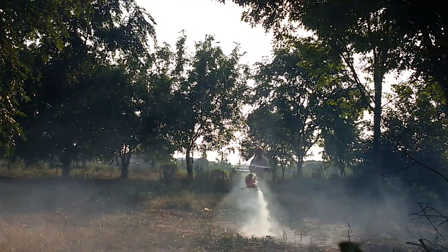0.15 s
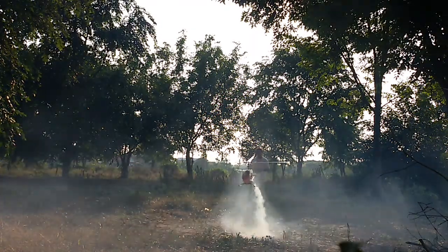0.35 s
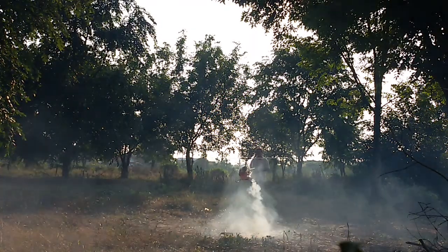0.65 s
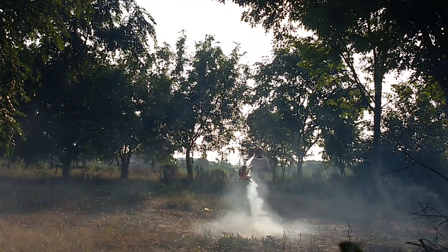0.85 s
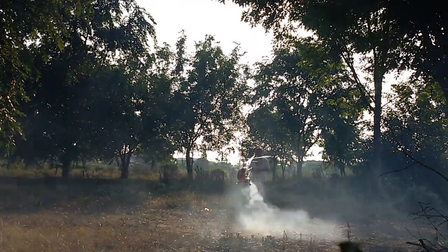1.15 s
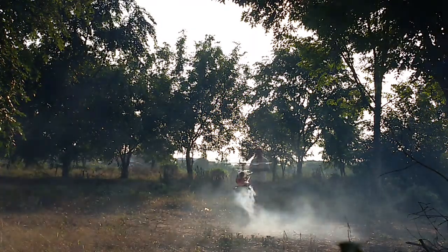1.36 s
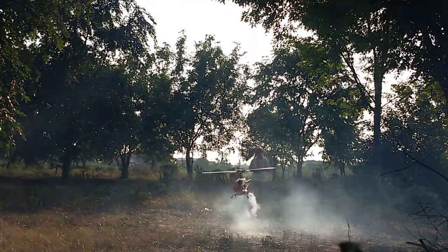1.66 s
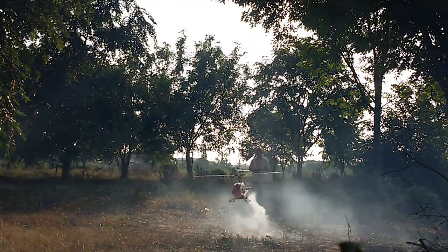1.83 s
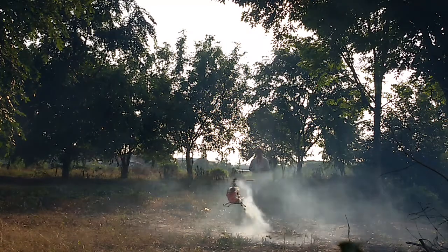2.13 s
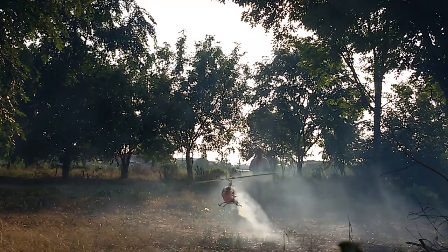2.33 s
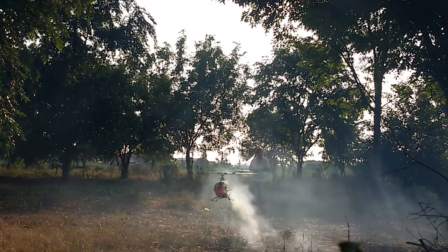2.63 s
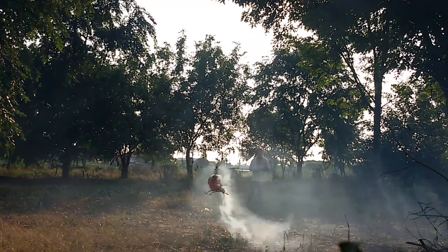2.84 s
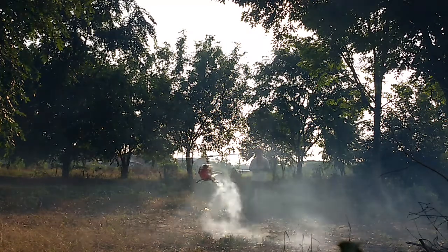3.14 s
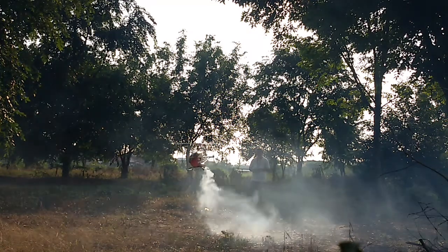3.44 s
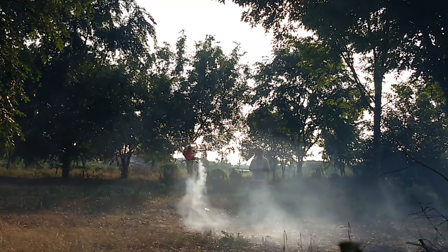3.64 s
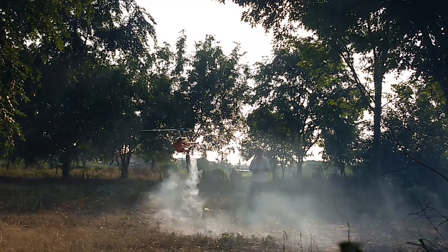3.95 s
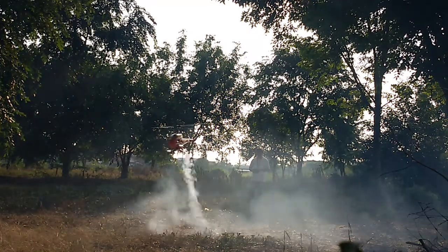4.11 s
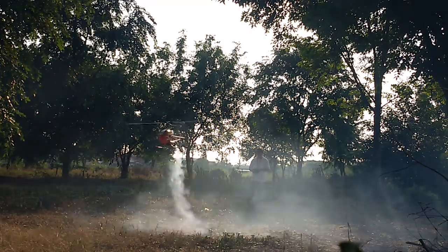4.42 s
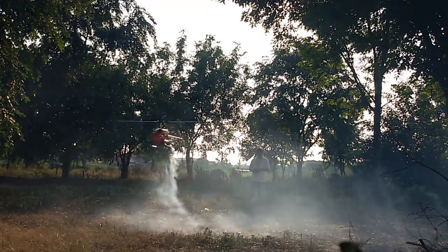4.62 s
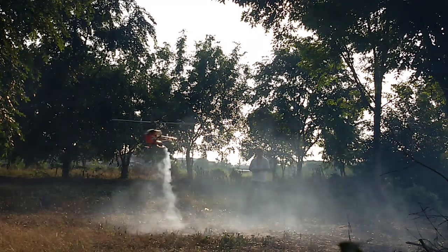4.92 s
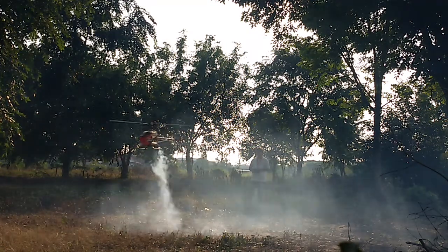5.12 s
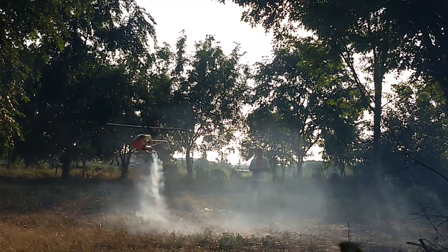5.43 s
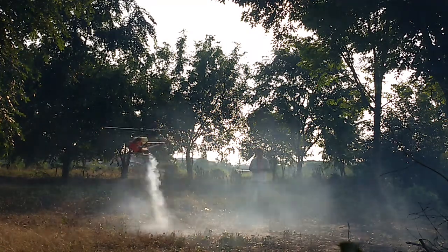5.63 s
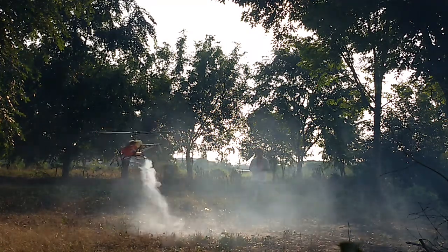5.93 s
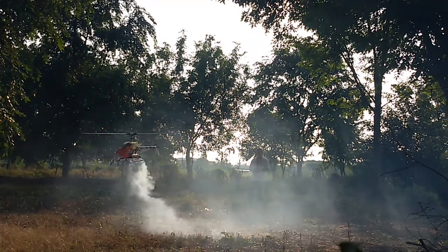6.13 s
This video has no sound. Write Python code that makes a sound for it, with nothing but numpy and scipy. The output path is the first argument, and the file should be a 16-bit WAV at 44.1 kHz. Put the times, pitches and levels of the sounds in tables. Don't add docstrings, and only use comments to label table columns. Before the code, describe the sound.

Steady nasal buzz of a model helicopter engine outdoors, with fluttering sharp rotor whistles, airy hiss, brief misfires and soft wind thumps.

```python
import sys
import numpy as np
from scipy import signal
from scipy.fft import rfft, irfft, next_fast_len
from scipy.io import wavfile
from scipy.ndimage import uniform_filter1d, map_coordinates

SR = 44100
rng = np.random.default_rng(int(sys.argv[2]) if len(sys.argv) > 2 else 0)


def persist_wave(psi):
    counts = np.round(np.clip(psi, -1, 1) * 32767).astype(np.int16)
    wavfile.write(sys.argv[1], SR, np.atleast_2d(counts).T)


def magnitude_from_level(level_db):
    exponent = np.asarray(level_db, float) / 20
    return 10 ** exponent


N = 276507
TOP_HZ = 14530

# (time [s], speed [Hz])
CRANK_SPEED = [(0.0, 196.33), (0.2, 196.64), (0.4, 198.17), (0.6, 198.51), (1.0, 200.2), (1.4, 202.15),
               (1.8, 204.84), (2.2, 205.42), (2.5, 205.58), (3.0, 206.63), (3.4, 205.5), (3.8, 206.66),
               (4.4, 208.89), (4.8, 209.15), (5.3, 210.33), (5.6, 210.61), (5.9, 211.87), (6.27, 211.94)]
# (time [s], engine loudness [dB], lag of the ground echo [ms], raggedness of the firing [dB])
HOVER_PATH = [(0, -.5, .6, -0.5), (.8, 0, 0.78, 1), (1.1, -1.5, 0.8, 1.5), (1.4, 3.5, 0.77, 2),
              (1.7, 1, 0.67, 0.5), (2, 0, 0.58, -2), (2.4, -1, 0.61, -4.5), (2.8, -2, 0.65, -3),
              (3.1, -3.5, 0.795, -4), (3.4, -1.5, 0.86, 0.5), (3.7, -3.5, 1, -1), (4, .5, 1.046, 2),
              (4.4, 0, 1.17, 4), (4.8, 0, 1.2, 1.5), (5.2, -1, 1.13, 3.5), (5.6, 0, 1.07, 4.5),
              (6, 2, 1.03, 1.5), (6.27, 1, 1.03, 4.5)]
# (time [s], downwash [dB], tilt of the disc to the camera [dB], bite of the blade edges [dB])
ROTOR_STATE = [(0, -1, 8, -3), (.3, 0, 7, -1), (.6, -0.11, 2, -9.5), (.9, -1.7, -8.5, -11),
               (1.2, 1, -2.5, -10), (1.5, 1, 1.5, -1.5), (1.8, 0, 4, 0.5), (2.1, -0.1, 8.5, 0.5),
               (2.4, 0.5, 9, 0.5), (2.7, .5, 4.5, 2.5), (3, 0.35, 4.5, 4.5), (3.3, -1, -6, -3.5),
               (3.7, -2, -6, 0), (4.2, -0.2, -1, -0.5), (4.5, .5, -3, 4), (5.1, 0, -3.5, 2),
               (5.7, -2, -8.5, 0.5), (6.27, 0, -6, 0.5)]


def unit(x):
    return x / np.sqrt(np.mean(np.abs(x) ** 2) + 1e-20)


def curves(rows):
    seconds, *columns = np.transpose(rows)
    return [np.interp(np.arange(N) / SR, seconds, column) for column in columns]


def wobble(rate):
    knots = rng.standard_normal(int(N * rate / SR) + 4)
    return map_coordinates(knots, [np.arange(N) * rate / SR])


def swells(seconds, sizes, lengths):
    t = np.arange(0, N + 64, 64)
    s, size, length = (np.reshape(v, (-1, 1)) for v in (seconds, sizes, lengths))
    bells = size * np.exp(-((t / SR - s) / length) ** 2)
    return np.interp(np.arange(N), t, np.sum(bells, axis=0))


def coloured(x, points, lo_hz=0, hi_hz=SR):
    size = next_fast_len(N + 8192)
    hz = np.fft.rfftfreq(size, 1 / SR)
    f, db = np.transpose(points)
    gain = magnitude_from_level(np.interp(np.log(hz + 1), np.log(f + 1), db))
    gain = gain * (hz >= lo_hz) * (hz < hi_hz)
    return irfft(rfft(x, size) * gain, size)[:N]


def patchy(patchy_db):
    z = signal.stft(rng.standard_normal(N), nperseg=512)[2]
    field = uniform_filter1d(rng.standard_normal(z.shape), size=6, axis=0)
    field = uniform_filter1d(field, size=12, axis=1)
    return signal.istft(z * magnitude_from_level(patchy_db * unit(field)), nperseg=512)[1][:N]


def exhaust(crank):
    # (order, level [dB])
    order_levels = [(1, 0), (2, 0), (3, -4.5), (4, -6), (5, -6.5), (6, -4.5), (7, -4.5), (8, -7.5), (9, -5),
                    (10, -5.5), (11, -15), (12, -21), (13, -26.5), (14, -22), (15, -14), (16, -18.5),
                    (17, -18.5), (18, -19.5), (19, -16.5), (20, -11.5), (21, -14.5), (22, -18.5)]
    muffler_levels = [-37, -34, -34.5, -31, -26.5]
    shaken = crank + 0.006 * wobble(60)
    out = np.zeros(N)
    for order, (number, db) in enumerate(order_levels, 1):
        flutter_db = min(1.3 + .2 * number, 2.1) * (.45 * wobble(5) + wobble(16))
        drift = 2 * np.pi * rng.random() + 0.043 * number * wobble(9)
        group_db = muffler_levels[np.searchsorted([1, 2, 5, 7], order)]
        tone = np.sin(2 * np.pi * order * shaken + drift)
        out += np.sqrt(2) * magnitude_from_level(group_db + db + flutter_db) * tone
    return magnitude_from_level(curves(HOVER_PATH)[0]) * out


def odd_firings(crank):
    # (frequency [Hz], level [dB])
    pop_colour = [(25, -40), (60, -24), (110, -2), (300, -6), (510, -2.5), (720, -3), (1100, -4), (1750, 1),
                  (2150, 2), (2400, -7), (2700, -23.5), (3000, -7), (4000, -8), (6000, -32.5)]
    # (level [dB], growth with raggedness [dB/dB], growth in a stumble [dB/dB])
    band_laws = [
        (-52, .4, 1.05),
        (-51.5, 1.1, .55),
        (-47.5, .45, .3),
    ]
    # (time [s], strength [dB])
    stumbles = [(.68, 5), (.98, 8.5), (1.191, 8.5), (1.36, 5.5), (1.55, 7.5), (1.849, 7.5), (2.04, 10.5),
                (2.36, 3), (2.55, 6), (2.85, 5.5), (3.25, 6), (3.49, 7.5), (3.65, 6.5), (3.75, 4),
                (4.0, 3.5), (4.36, 7.5), (4.52, 7.5), (4.769, 10.5), (5.07, 2), (5.22, 6.5), (5.38, 4.5),
                (5.601, 5.5), (5.72, 6), (5.869, 3), (5.99, 9), (6.12, 8)]
    stumble_s = .035
    edges_hz = [0, 440, 1000, SR]
    fired = np.diff(np.floor(crank), prepend=0) > 0
    pops = unit(fired * rng.standard_normal(N)) + 0.99 * patchy(patchy_db=4.0)
    ragged_db = curves(HOVER_PATH)[2]
    stumble_db = swells(*np.transpose(stumbles), stumble_s)
    out = np.zeros(N)
    for (db, with_ragged, with_stumble), lo, hi in zip(band_laws, edges_hz, edges_hz[1:]):
        level_db = db + 23.5 + with_ragged * ragged_db + with_stumble * stumble_db + 1.1 * wobble(12)
        out += coloured(magnitude_from_level(level_db) * pops, pop_colour, lo, hi)
    return out


def over_field(x):
    echo_share, echo_hz = .41, 3970
    lag = curves(HOVER_PATH)[1] * SR / 1000
    late = map_coordinates(x, [np.arange(N) - lag])
    return x + echo_share * coloured(late, [(echo_hz / 2, 0), (echo_hz * 2, -12)])


def whistle(rotor, edge, level_db):
    tip_mach = .3
    rated_hz = 206
    pitch_with_speed = .6
    top_hz, top_turn, early, width, late_db, band_hz = edge
    u = (rotor - top_turn + .5) % 1 - .5
    doppler = (1 - tip_mach) / (1 - tip_mach * np.cos(2 * np.pi * u))
    hz = top_hz * (curves(CRANK_SPEED)[0] / rated_hz) ** pitch_with_speed * doppler
    coming = np.exp(-.5 * ((u - early) / width) ** 2)
    going = magnitude_from_level(late_db) * np.exp(-.5 * ((u + early) / (1.5 * width)) ** 2)
    unsteady = unit(3.2 * (120 / band_hz) ** .6 + wobble(band_hz) + 1j * wobble(band_hz))
    tone = np.real(unsteady * np.exp(2j * np.pi * np.cumsum(hz) / SR))
    each_pass_db = .6 * wobble(24)
    beam = (0.048 / width) ** .6
    return np.sqrt(2) * magnitude_from_level(level_db + each_pass_db) * (coming + going) * tone * beam


def blade_whistles(rotor):
    # (top pitch [Hz], rotor angle at the top [turns], loudest against the top [turns],
    # lobe width [turns], late lobe [dB], bandwidth [Hz])
    edges = [
        (13980, .805, -0.084, .028, -14.5, 120),
        (8362, .8, -0.074, 0.036, -8, 400),
        (10720, 0.37, -0.085, 0.078, -9.5, 730),
        (7865, .31, -0.074, 0.11, -22, 900),
    ]
    # (level [dB], growth with tilt [dB/dB], growth with bite [dB/dB])
    edge_laws = [(-20, 1.1, .01), (-16, .01, 1.01), (-27, -0.7, 0.82), (-26, .7, .3)]
    _, tilt_db, bite_db = curves(ROTOR_STATE)
    return sum(whistle(rotor, edge, db + with_tilt * tilt_db + with_bite * bite_db)
               for edge, (db, with_tilt, with_bite) in zip(edges, edge_laws))


def hiss(crank, rotor):
    # (frequency [Hz], level per Hz [dB])
    air_colour = [(1500, -26), (2750, -30), (3500, -18), (4050, -6.5), (4930, -11), (5980, -2.5),
                  (7000, -4), (8000, -2), (8900, -6.5), (9600, -5.5), (11500, -6.5), (13500, -4.5),
                  (14400, -4)]
    split_hz = 9300
    wash_db, tilt_db, _ = curves(ROTOR_STATE)
    lower_db = -17.5 + wash_db + 0.35 * curves(HOVER_PATH)[0] - 0.24 * tilt_db
    upper_db = -21 + wash_db
    puff = np.cos(2 * np.pi * crank)
    swish = np.cos(4 * np.pi * (rotor - .8))
    lower = unit(coloured(patchy(patchy_db=0.5), air_colour, hi_hz=split_hz))
    upper = unit(coloured(patchy(patchy_db=1.0), air_colour, lo_hz=split_hz, hi_hz=TOP_HZ))
    lower *= magnitude_from_level(lower_db + 0.85 * puff + 0.72 * swish + 0.27 * wobble(9))
    upper *= magnitude_from_level(upper_db + 0.53 * puff + 2.17 * swish + 0.45 * wobble(9))
    return lower + upper


def tail_rotor(crank):
    # (multiple of crank speed, level [dB])
    tail_tones = [(.5, -52), (1.5, -51.5)]
    out = np.zeros(N)
    for multiple, db in tail_tones:
        phase = 2 * np.pi * multiple * crank + .8 * wobble(5.4)
        out += np.sqrt(2) * magnitude_from_level(db + 4.4 * wobble(11)) * np.sin(phase)
    return out


def breeze():
    # (time [s], peak level [dB], length [s])
    gusts = [(.17, -55, .05), (0.577, -44, 0.077), (.74, -57, .04), (1.15, -41.5, 0.14),
             (1.552, -51.5, 0.14), (1.974, -37.5, .13), (2.52, -48.5, .05), (2.72, -48, 0.058),
             (2.872, -46, .04), (3.27, -39.5, 0.053), (3.552, -46.5, .08), (3.77, -46.5, .05),
             (3.93, -43, .07), (4.304, -41, 0.052), (4.5, -48, .07), (4.833, -44, 0.11),
             (5.051, -42.5, .06), (5.294, -38, 0.046), (5.548, -40.5, 0.052), (5.71, -52.5, 0.048),
             (5.945, -37, 0.054), (6.12, -38, 0.043)]
    # (frequency [Hz], level per Hz [dB])
    rumble_colour = [(20, -22), (45, -12.5), (80, -0.5), (130, -4), (200, -26)]
    calm_db = -67.5
    s, db, length = np.transpose(gusts)
    strength = magnitude_from_level(calm_db) + swells(s, magnitude_from_level(db), length)
    rumble = unit(coloured(rng.standard_normal(N), rumble_colour))
    return strength * magnitude_from_level(3.6 * wobble(18)) * rumble


def scene():
    gear = 8.52
    crank = np.cumsum(curves(CRANK_SPEED)[0]) / SR
    rotor = crank / gear
    engine = over_field(exhaust(crank) + odd_firings(crank))
    one = engine + blade_whistles(rotor) + hiss(crank, rotor) + tail_rotor(crank) + breeze()
    return np.array([one, one])


def camera_rounding(x, hop=1024, lead=1728, rate=48000):
    # (frequency [Hz], step [dB])
    step_sizes = [(50, -12), (300, -12), (750, -13.5), (1500, -12), (2700, -11), (3500, -13.5), (5000, -14),
                  (9000, -15), (14000, -15)]
    fast = signal.resample_poly(x, 160, 147)
    n, k = np.arange(2 * hop)[:, None] + .5, np.arange(int(2 * hop * TOP_HZ / rate)) + .5
    window = np.sin(np.pi * n / (2 * hop))
    basis = np.sqrt(2 / hop) * window * np.cos(np.pi / hop * (n + hop / 2) * k)
    blocks = np.pad(fast, (lead, 2 * hop - (len(fast) + lead) % hop)).reshape(-1, hop)
    terms = np.hstack([blocks[:-1], blocks[1:]]) @ basis

    band = np.searchsorted(np.r_[4:40:4, 40:96:8, 96:144:12, 144:len(k):24], k)
    f, db = np.transpose(step_sizes)
    s, _, tilt_db, _ = np.transpose(ROTOR_STATE)
    block_s = (np.arange(len(terms)) * hop + hop - lead) / rate
    busy_db = np.interp(block_s, s, tilt_db) - 1
    chance_db = rng.standard_normal((len(terms), band.max() + 1))[:, band]
    chance_db = chance_db + .8 * rng.standard_normal((len(terms), 1))
    usual_db = np.interp(np.log(k * rate / 2 / hop), np.log(f), db)
    step = magnitude_from_level(usual_db + .36 * busy_db[:, None] + 1.2 * chance_db)

    count = np.floor((np.abs(terms) / step) ** .75 + .4054)
    frames = (step * np.sign(terms) * count ** (4 / 3)) @ basis.T
    joined = (frames[1:, :hop] + frames[:-1, hop:]).ravel()[lead - hop:]
    return signal.resample_poly(joined, 147, 160)[:N]


def roll_off(x):
    return signal.sosfilt(signal.butter(12, 15450, fs=SR, output="sos"), x)


def record(dry):
    soft = dry[0] / (1 + np.abs(dry[0] / .86) ** 6) ** (1 / 6)
    rounded = camera_rounding(soft)
    return roll_off(np.array([rounded, rounded]))


dry = scene()
out = record(dry)
persist_wave(out)
```